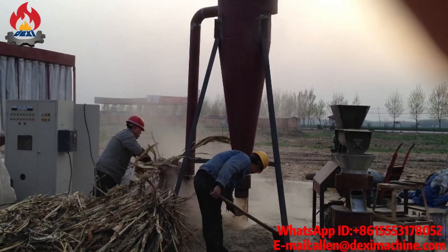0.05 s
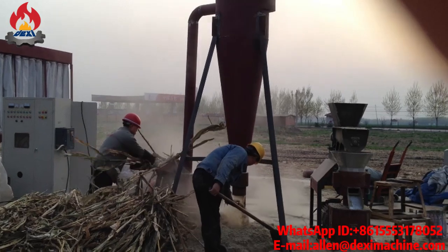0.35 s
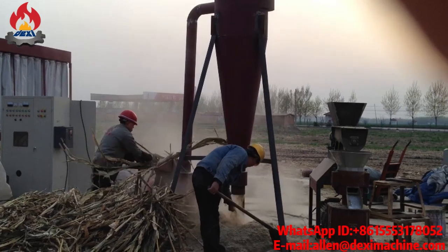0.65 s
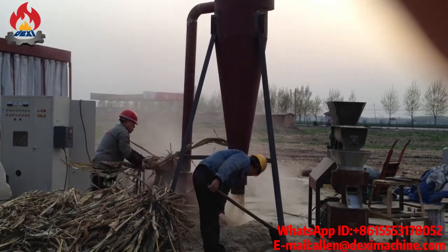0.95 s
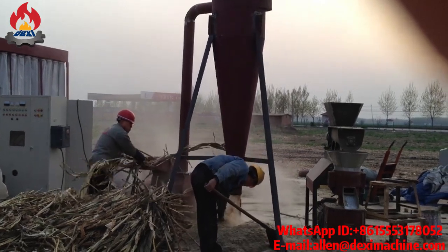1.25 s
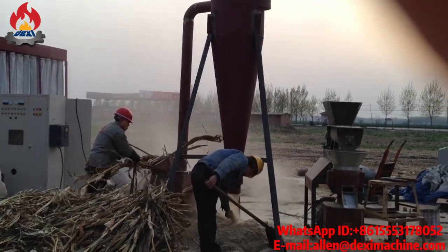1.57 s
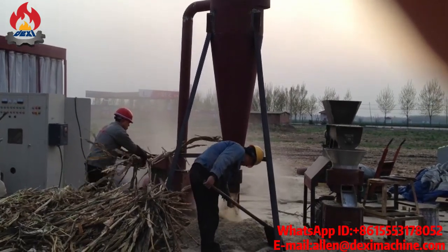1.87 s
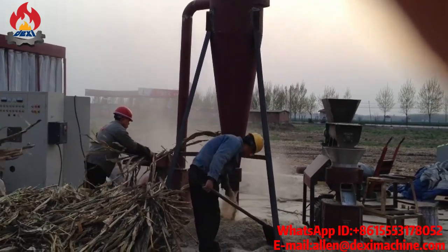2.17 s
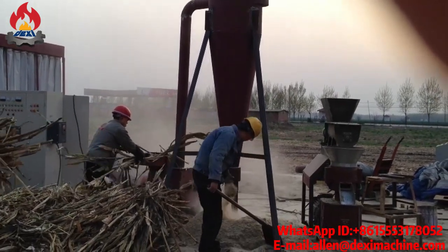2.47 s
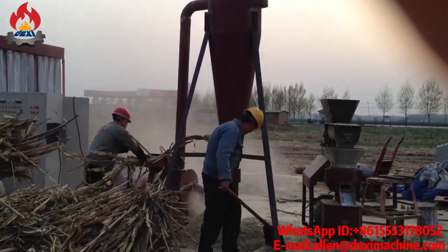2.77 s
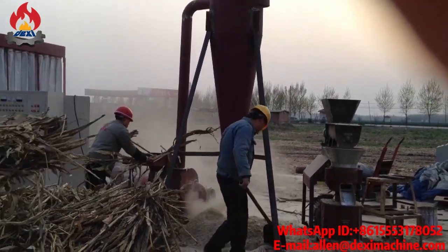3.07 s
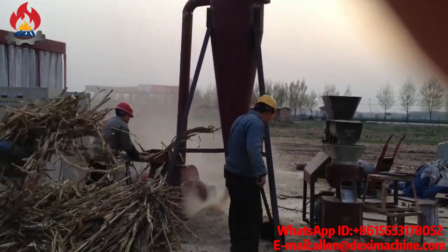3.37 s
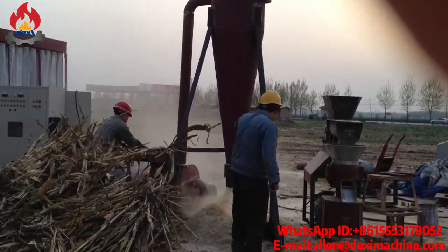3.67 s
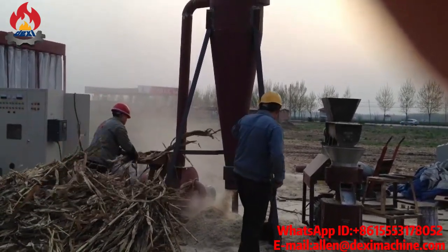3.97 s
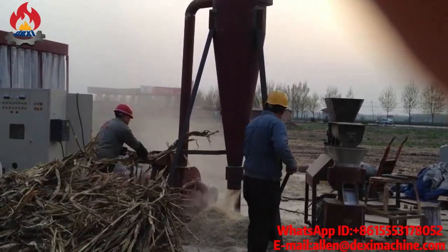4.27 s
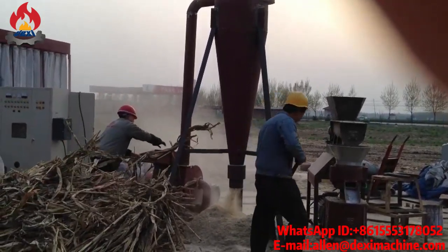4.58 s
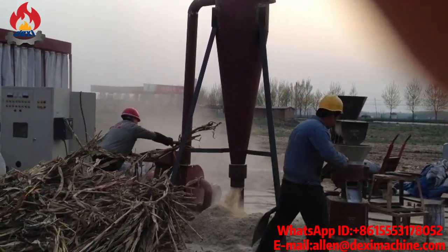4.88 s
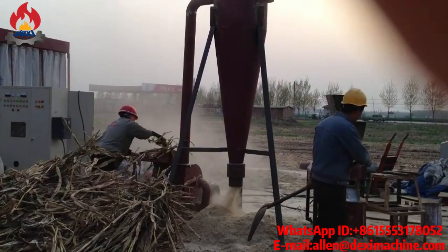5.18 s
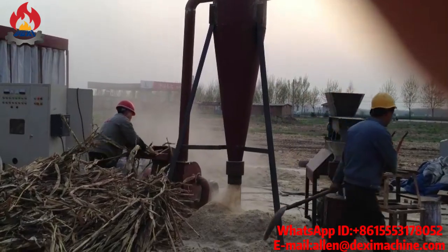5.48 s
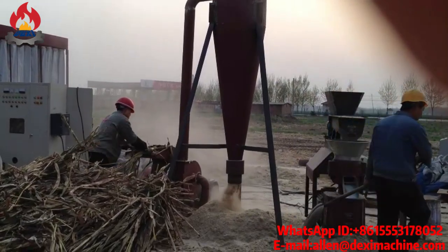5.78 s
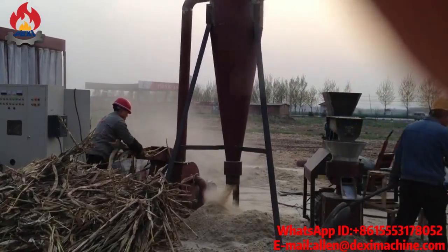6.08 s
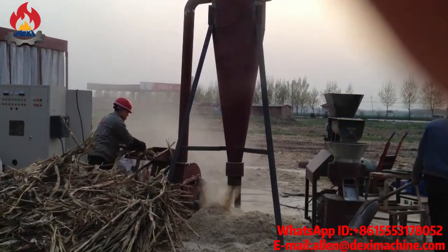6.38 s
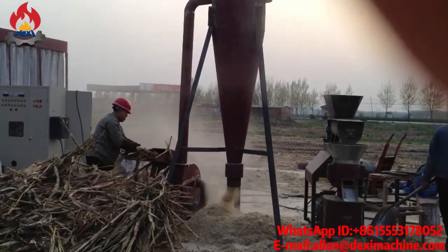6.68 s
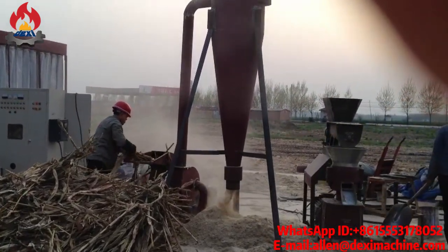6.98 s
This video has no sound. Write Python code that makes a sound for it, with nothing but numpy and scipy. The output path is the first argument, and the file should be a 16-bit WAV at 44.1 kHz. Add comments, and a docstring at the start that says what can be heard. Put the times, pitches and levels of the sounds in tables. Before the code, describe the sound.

A hammer mill is already running in an open yard: a steady low drone and a higher fan whine sit over a roar of air, while chaff pelts a steel screen with a bright, ringing hiss. At about 0.5 seconds an armful of dry stalks shreds in a harsh surge of cracks, briefly choking the fan. Lighter feeding follows, with small crunches near 1.4 seconds and sharp snaps around 3. At 3.6 seconds a big bundle tears through with a rumble and dull thumps, dulling the whine again, and scattered snaps follow. The heaviest surge comes near 5.4 seconds, with loud cracks and the strongest choking of the fan. The overall level ducks slightly and creeps back while more stalks snap and tear, with one more sharp crunch at about 7 seconds. The mill keeps running throughout.

```python
"""A hammer mill is already running in an open yard: hammer rows and fan drone over a roar of air,
and chaff pelts the ringing steel screen. Half a second in, an armful of dry stalks is shredded in a
harsh surge of cracks and chokes the fan. Lighter feeding follows, until a big armful chokes it again
near 3.6 s. The heaviest, near 5.4 s, clogs the fan hardest and ducks the gain, which creeps back
while more stalks snap and tear to the end."""
import sys
import numpy as np
from scipy import signal
from scipy.fft import rfft, irfft
from scipy.io import wavfile

SR = 44100
rng = np.random.default_rng(int(sys.argv[2]) if len(sys.argv) > 2 else 0)


def materialize(psi):
    """Save the field psi as 16-bit PCM at rate SR to the path in sys.argv[1].

    A 1-D psi becomes a single channel; in a 2-D psi each row is a channel.
    """
    bounded = np.clip(np.atleast_2d(psi).T, -1, 1)
    quanta = np.round(bounded * 32767).astype(np.int16)
    wavfile.write(sys.argv[1], SR, quanta)


N = 314874
T = np.arange(N) / SR

# The rotor sags under each bundle. Each row: time in seconds, speed in turns per second.
ROTOR_SPEED = [(0.2, 52.97), (0.5, 52.96), (0.75, 52.91), (1.2, 52.97), (2.2, 52.99), (3.4, 52.99),
               (3.85, 52.84), (4.5, 52.95), (5.4, 52.99), (5.85, 52.91), (6.4, 52.91), (7.05, 52.94)]
# The bed of the mill. Each row: time in seconds, then faders in dB for hammer tone, fan tone and air roar.
BED_LEVELS = [(.1, -32, -33, -30), (1, -35, -35, -32), (1.4, -34, -34, -30.5), (2.45, -35, -33, -31),
              (2.62, -32, -32, -31), (3.1, -32.5, -32.5, -30), (3.65, -32, -34, -30),
              (4.15, -31.5, -34, -30), (5.05, -34.5, -33.5, -30.5), (5.38, -32, -29.5, -31.5),
              (5.5, -36.5, -30, -32), (6.1, -33.5, -38, -31.5), (7.1, -35, -36.5, -31.5)]
# Partials of the drone. Each row: multiple of the rotor speed, relative level in dB.
HAMMER_PARTIALS = [(2, -24), (3, -18), (4, 0.5), (5, -19.5), (6, -15), (8, -5), (12, 0)]  # four rows of hammers
FAN_PARTIALS = [(18, 0.5), (24, -7.5), (36, -10.5)]  # six fan blades
BUZZ_PARTIALS = [(38, -12), (40, -5), (44, 0), (45, -9), (47, -7), (48, -5), (49, -9), (51, -7), (52, -6),
                 (54, -5), (60, -13)]  # steel shaken in step with the rotor
# Resonances. Each row: pitch in Hz, bandwidth in Hz, relative level in dB.
DUCT_MODES = [(160, 11, -6), (222.7, 27, 1), (257, 36, 0.5), (314, 43, 0.5)]  # hollow casing and duct
STEEL_MODES = [(754, 5, -7), (1710, 14, -11), (1993, 8, -5), (2384, 16, -8), (2564, 25, -3), (2640, 70, -1),
               (2770, 60, -3), (2848, 12, -1), (3177, 22, -7)]  # ringing screen and hammers
# EQ curves. Each row: frequency in Hz, relative level in dB.
ROAR_EQ = [(25, -60), (65, -27), (100, -18.5), (160, -2.5), (330, -12.5), (480, -9), (600, -1), (900, 2),
           (1040, 0), (1200, -6.5), (1600, -4.5), (1850, -1.5), (2200, -6), (4000, -25)]  # rushing air
CHAFF_EQ = [(40, -72), (900, -30.5), (1700, -8), (2200, -8.5), (2400, -2.5), (2600, 5.5), (2820, 1),
            (2980, -5), (3300, -5), (4200, -13), (5000, -18), (6300, -27), (9000, -23.5), (15000, -41)]  # chaff on the screen
SHRED_EQ = [(40, -37), (250, -6), (800, -9.5), (2200, 3), (3600, 6.5), (4600, 5.5), (5700, -2), (6600, -3),
            (7900, 4.5), (8900, 5), (10500, -5), (11400, 3), (14100, -2.5), (15500, -46)]  # tearing fibres
SNAP_EQ = [(40, -54), (500, -8), (1400, -5), (2200, 3.5), (3000, 7), (4400, 2), (5300, -3), (6300, -13),
           (8400, 2), (10400, -11.5), (11800, -15), (14000, -16), (15500, -43)]  # a breaking stalk
THUMP_EQ = [(30, -32), (90, -22), (170, -10), (260, 4), (330, -2), (450, -6), (1000, -33), (4000, -60)]  # a blow to the chute
# Shredded stalks clog the fan. Each row: start in seconds, seconds until it starts to clear,
# loss of fan tone in dB.
FAN_CLOGS = [(0.608, 0.19, 7), (3.675, 0.67, 4.5), (5.472, 0.31, 10), (5.8, 0.92, 1)]
# The steady feed between surges. Each row: time in seconds, chaff fader in dB, shredding fader in dB.
STEADY_FEED = [(.1, -25.5, -32), (.85, -26.5, -33.5), (1.9, -26, -34), (2.7, -25, -33.5), (3.4, -25, -32),
               (4.1, -26, -32), (4.7, -25.5, -31.5), (5.4, -26, -31), (5.68, -26, -32), (5.9, -25, -28),
               (6.5, -23.5, -28.5), (6.93, -26.5, -33), (7.14, -25, -26)]
# Armfuls drawn in. Each row: peak time, rise and fall in seconds, shredding fader in dB.
ARMFULS = [(.36, 0.031, 0.051, -28), (.5, 0.062, 0.09, -28), (.62, .035, 0.051, -26.5),
           (2.15, 0.086, 0.045, -31.5), (2.79, 0.025, 0.031, -35), (2.92, 0.027, 0.033, -39),
           (3.1, 0.036, 0.033, -32), (3.49, 0.018, 0.048, -29), (3.59, 0.026, 0.096, -23.5),
           (3.77, 0.058, 0.048, -26), (3.89, 0.013, 0.027, -29.5), (4.24, 0.026, 0.013, -33),
           (4.64, 0.046, 0.14, -32.5), (5.3, 0.062, 0.079, -33), (5.445, 0.042, 0.089, -20),
           (5.61, 0.034, 0.02, -32), (6.035, 0.033, 0.019, -25), (6.39, 0.044, 0.13, -30.5),
           (6.84, 0.032, 0.055, -33), (7.05, 0.008, 0.0096, -23.5), (7.115, .02, 0.02, -29)]
# Bundles dragged in at once. Each row: peak time and half length in seconds,
# then faders in dB for tearing, dull rumble and thump.
BUNDLES = [(0.427, 0.015, -23.5, -29, -42), (.497, 0.018, -30, -28, -42), (1.328, 0.027, -29, -28.5, -47),
           (1.475, .025, -26, -26.5, -47), (3.594, 0.016, -20.5, -21.5, -30), (3.625, 0.015, -25, -30, -28),
           (3.67, 0.04, -28, -33, -40), (3.72, .012, -27, -33, -28), (5.447, 0.018, -16.5, -41, -46),
           (6.054, 0.0079, -18, -24, -38), (7.052, 0.012, -13.5, -29, -46)]
# Thick stalks snapping. Each row: start in seconds, level in dB, clack pitch in Hz,
# then clack and fibre tail in dB relative to that level.
THICK_STALKS = [(0.353, -18, 3900, -6, -7), (0.4076, -14, 3700, -5, -10), (0.428, -16.5, 3300, -2, -13),
                (0.4885, -11, 3960, 1, -13), (0.511, -17, 3020, -6, -12), (0.524, -19, 3700, -5, -14),
                (0.599, -18, 3500, -8, -9), (0.6268, -16, 3340, -8, -12), (2.7874, -18, 4300, -12, -9),
                (2.9046, -14.5, 3800, -10, -10), (2.919, -22, 4500, -6, -14), (2.952, -15, 2880, -10, -15),
                (3.1136, -18, 2820, -6, -6), (3.785, -12.5, 4120, 0, -18), (3.8222, -16, 3070, 3, -8),
                (4.181, -20, 3900, -17, -2), (4.238, -17, 3900, -6, -8), (4.308, -22, 3700, -8, -10),
                (4.556, -16.5, 2760, 4, -5), (4.597, -22, 4500, -12, -3), (4.6075, -16.5, 4500, -12, -9),
                (5.2925, -15.5, 3260, -3, -12.5), (5.4397, -9, 3030, 1, -13), (5.481, -16, 4300, -8, -8),
                (5.4955, -7, 3140, -1, -18), (5.5008, -7, 3200, 0.5, -19), (5.582, -16, 3630, -4, -9),
                (5.6246, -17, 3320, -2, -6), (5.783, -15.5, 3350, -5, -7), (5.834, -9, 3930, -0.5, -14),
                (5.872, -15, 3600, -4, -12), (6.1615, -17.5, 2840, -4, -13), (6.192, -18, 3900, -3, -15),
                (6.1976, -17, 3040, -4, -17), (6.2103, -8, 3400, -4, -16), (6.2638, -14.5, 3950, 0, -8),
                (6.822, -17, 3000, -1, -8), (6.8392, -13.5, 2850, 0, -16), (6.8985, -14.5, 3600, -2, -13),
                (6.917, -18, 2870, 4, -6), (6.968, -17, 2840, -2, -14), (7.002, -21, 3690, 3, -11),
                (7.0355, -18, 3200, -4, -14), (7.1108, -15, 3860, -6, -7)]

SURGE_CHAFF, SURGE_AIR = 0.33, 0.24  # share of a surge's lift in dB that chaff and air follow


def amp(db):
    """Decibels to gain."""
    return 10 ** (np.asarray(db) / 20)


def unit(x):
    """Scales to an rms of 1."""
    return x / np.sqrt(np.mean(x ** 2) + 1e-20)


def curves(rows):
    """Automation lanes: each column of a table, joined by straight lines in time."""
    times, *columns = np.transpose(rows)
    return [np.interp(T, times, column) for column in columns]


def wander(hz):
    """Random drift of rms 1, rolled off above hz."""
    f = np.fft.rfftfreq(N, 1 / SR)
    return unit(irfft(rfft(rng.standard_normal(N)) / (1 + (f / hz) ** 4), N))


def colour(x, eq, size=4096):
    """Minimum-phase EQ of unit energy: sharp attacks, short tails."""
    hz, db = np.transpose(eq)
    f = abs(np.fft.fftfreq(size, 1 / SR))
    log_gain = np.log(amp(np.interp(np.log(f + 1), np.log(hz), db)))
    response = np.exp(np.conj(signal.hilbert(log_gain)))
    taps = np.fft.ifft(response).real[:size // 2]
    return signal.oaconvolve(x, taps / np.linalg.norm(taps))[:N]


def ring(x, modes):
    """Drives a bank of damped resonances of alternating polarity; the result has an rms of 1."""
    t = T[:SR // 2]
    taps = np.zeros(len(t))
    for k, (hz, width, db) in enumerate(modes):
        decay = amp(db) * np.sqrt(width) * np.exp(-np.pi * width * t)
        taps += (-1) ** k * decay * np.cos(2 * np.pi * hz * t)
    return unit(signal.oaconvolve(x, taps)[:N])


def impacts(per_s, spread_db):
    """Random tiny blows, most weak and a few strong."""
    size = amp(spread_db * np.minimum(rng.exponential(1, N), 4))
    return unit(size * rng.choice([-1, 1], N) * (rng.random(N) < per_s / SR))


def bursts(per_s, spread_db, decay_s):
    """Envelope of random breaks: each hits at once and dies away."""
    onsets = abs(impacts(per_s, spread_db))
    return unit(signal.lfilter([1], [1, -np.exp(-1 / (decay_s * SR))], onsets))


def tones(turns, partials, waver, waver_hz):
    """Partials locked to the rotor, each wavering in level and phase."""
    out = np.zeros(N)
    for order, db in partials:
        angle = 2 * np.pi * (round(order) * turns + rng.random())
        in_phase = (1 + waver * wander(waver_hz)) * np.cos(angle)
        quadrature = waver * wander(waver_hz) * np.sin(angle)
        out += amp(db) * (in_phase + quadrature)
    return out / np.sqrt(1 / 2 + waver ** 2)


def choking(clog_s=0.16, clear_s=0.19):
    """Loss of fan tone in dB: it builds as the fan clogs, holds, and clears."""
    loss_db = np.zeros(N)
    for start, length, db in FAN_CLOGS:
        filling = (T - start) / clog_s
        clearing = 1 - (T - start - length) / clear_s
        loss_db += db * np.clip(np.minimum(filling, clearing), 0, 1)
    return loss_db


def feed():
    """An uneven feed swells with each armful: chaff fader, shredding fader and the surge's lift, in dB."""
    chaff_db, steady_db = curves(STEADY_FEED)
    power = amp(steady_db) ** 2
    for peak_s, rise_s, fall_s, db in ARMFULS:
        width_s = np.where(T < peak_s, rise_s, fall_s)
        power += amp(db) ** 2 * np.exp(-((T - peak_s) / width_s) ** 2)
    shred_db = 10 * np.log10(power)
    surge_db = shred_db - steady_db
    uneven = wander(hz=3.9)
    screen_db = chaff_db + SURGE_CHAFF * surge_db + 0.2 * uneven
    return screen_db, shred_db + 0.53 * uneven, surge_db


def air(surge_db, muffled_hz=(1000, 1650)):
    """Turbulent air rushes through the casing and booms in the duct; a clog scoops out its mids."""
    _, _, roar_db = curves(BED_LEVELS)
    swell_db = SURGE_AIR * surge_db + 0.63 * wander(hz=2.5)
    rush = amp(roar_db + swell_db) * colour(rng.standard_normal(N), ROAR_EQ)
    mids = signal.sosfiltfilt(signal.butter(2, muffled_hz, "band", fs=SR, output="sos"), rush)
    rush -= (1 - amp(-0.4 * choking())) * mids
    boom = ring(rng.standard_normal(N), DUCT_MODES)
    boom = signal.sosfilt(signal.butter(3, 120, "high", fs=SR, output="sos"), boom)
    return rush + amp(-38 + 1.1 * swell_db) * boom


def drone(turns):
    """Hammer rows and fan blades chop the air and shake the steel."""
    hammer_db, fan_db, _ = curves(BED_LEVELS)
    choke_db = choking()
    hammers = amp(hammer_db - 2.4) * tones(turns, HAMMER_PARTIALS, waver=0.21, waver_hz=8)
    fan = amp(fan_db - choke_db) * tones(turns, FAN_PARTIALS[:1], waver=0.081, waver_hz=4.6)
    # a clog dulls the fan's overtones most and the steel's buzz least
    overtones = amp(fan_db - 2.1 * choke_db) * tones(turns, FAN_PARTIALS[1:], waver=0.16, waver_hz=6.4)
    buzz = amp(-36.3 - 0.5 * choke_db) * tones(turns, BUZZ_PARTIALS, waver=0.55, waver_hz=5)
    return hammers + fan + overtones + buzz


def screen(turns, screen_db):
    """Clumps of chaff pelt the ringing steel screen, harder once a turn and at each of four hammer rows."""
    angle = 2 * np.pi * turns
    grains = impacts(per_s=6000, spread_db=2.5)
    pulse_db = 0.5 * np.cos(angle) + 0.5 * np.cos(4 * angle) + 0.6 * wander(hz=58)
    blows = grains * unit(amp(pulse_db)) * amp(screen_db)
    return amp(-0.5) * colour(blows, CHAFF_EQ) + amp(screen_db - 10.5) * ring(blows, STEEL_MODES)


def shredding(shred_db):
    """Dry fibres arrive in clumps and crack by the thousand, over the hiss of dust."""
    cracks = amp(-1.5) * impacts(per_s=5000, spread_db=2.0)
    dust = amp(-2.5) * rng.standard_normal(N)
    clumps = unit(amp(1.26 * wander(hz=58)))
    return colour((cracks + dust) * clumps * amp(shred_db - 0.25), SHRED_EQ)


def splinters(shred_db):
    """Thin stems split at random in short, bright ticks that ride the shredding level."""
    force = bursts(per_s=110, spread_db=1.5, decay_s=0.0015) * amp(shred_db)
    dull, bright = rng.standard_normal((2, N))
    return amp(-9.5) * colour(force * dull, SNAP_EQ) + amp(-6.5) * colour(force * bright, SHRED_EQ)


def snaps(attack_s=0.00086, tail_s=0.012):
    """A thick stalk gives way in milliseconds: a crack, a pitched clack and a crackling tail of fibres."""
    force, clacks, tails = np.zeros((3, N))
    bend_rad = 0.8 * wander(hz=300)  # the clack's pitch bends as the stalk splits
    for start_s, db, hz, clack_db, tail_db in THICK_STALKS:
        at = round(start_s * SR)
        age = T[:N - at]
        burst = amp(db) * age / attack_s * np.exp(1 - age / attack_s)
        force[at:] += burst
        clacks[at:] += amp(clack_db) * burst * np.sin(2 * np.pi * hz * age + bend_rad[at:])
        tails[at:] += amp(db + tail_db) * np.exp(-age / tail_s)
    fibres = colour(tails * impacts(per_s=1600, spread_db=2), SHRED_EQ)
    cracks = amp(-1.5) * colour(force * rng.standard_normal(N), SNAP_EQ)
    return cracks + clacks + fibres


def gulps():
    """A whole bundle tears in a volley, hits the screen, rumbles round the casing and thumps the chute."""
    tear, rumble, thump = np.zeros((3, N))
    for peak_s, half_s, tear_db, rumble_db, thump_db in BUNDLES:
        swell = np.exp(-((T - peak_s) / half_s) ** 2)
        tear += amp(tear_db) * swell
        rumble += amp(rumble_db) * swell
        thump += amp(thump_db) * swell
    volley = tear * bursts(per_s=1100, spread_db=1.0, decay_s=0.002)
    breaks, hits, rush, push = rng.standard_normal((4, N))
    crunch = amp(-8.5) * colour(volley * breaks, SNAP_EQ) + amp(-1) * colour(volley * hits, CHAFF_EQ)
    weight = colour(rumble * rush, ROAR_EQ) + colour(thump * push, THUMP_EQ)
    return crunch + weight


def scene():
    """The machine's bed with the breaking stalks on top, the same in both channels."""
    turns = np.cumsum(curves(ROTOR_SPEED)[0]) / SR
    screen_db, shred_db, surge_db = feed()
    machine = drone(turns) + air(surge_db) + screen(turns, screen_db)
    stalks = shredding(shred_db) + splinters(shred_db) + snaps() + gulps()
    return np.array([machine + stalks] * 2)


def record(dry, open_s=0.0824, sense_s=0.025, limit_db=-17, release_db_per_s=1.35, cutoff_hz=15400):
    """A quick fade-in, gain control that ducks fast and recovers slowly, a soft clip and a low-pass."""
    opened = dry * np.clip((T - open_s) / 0.0037, 0, 1)
    pole = np.exp(-1 / (sense_s * SR))
    power_db = 10 * np.log10(signal.lfilter([1 - pole], [1, -pole], opened[0] ** 2) + 1e-12)
    release_db = release_db_per_s * T
    held_db = np.maximum.accumulate(power_db + release_db) - release_db
    ducked = opened * amp(-np.maximum(held_db - limit_db, 0))
    rounded = ducked / (1 + (ducked / 0.8) ** 6) ** (1 / 6)
    low_pass = signal.firwin(401, cutoff_hz, window=("kaiser", 8), fs=SR)
    return signal.oaconvolve(rounded, low_pass[None], "same")


dry = scene()
out = record(dry)
materialize(out)
```